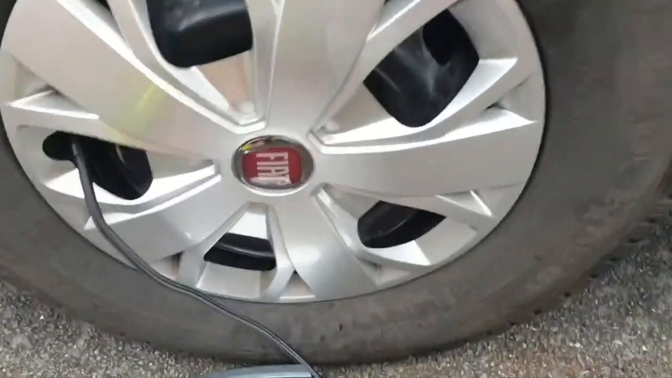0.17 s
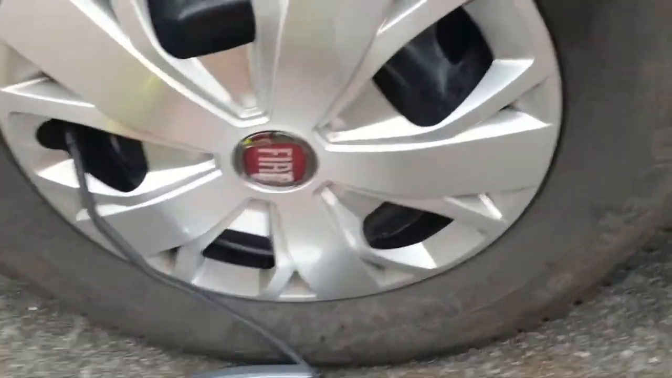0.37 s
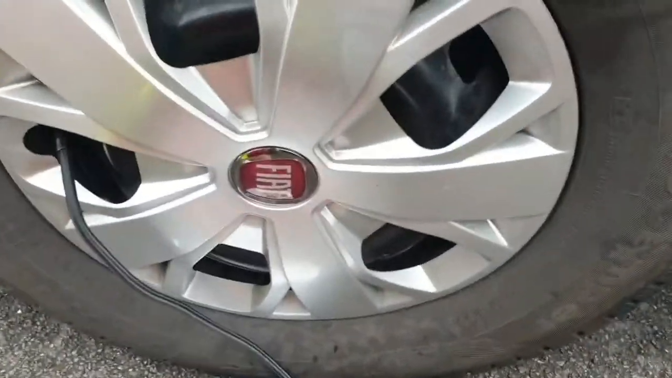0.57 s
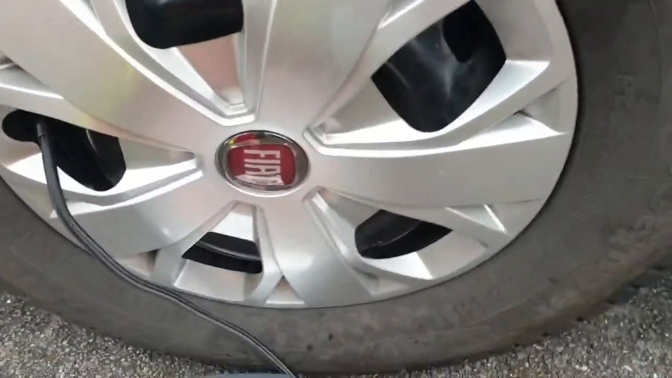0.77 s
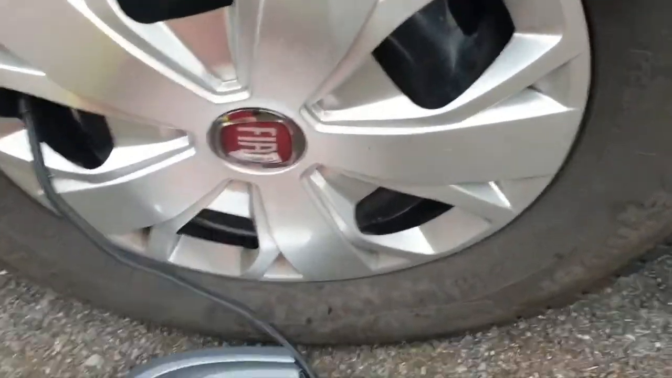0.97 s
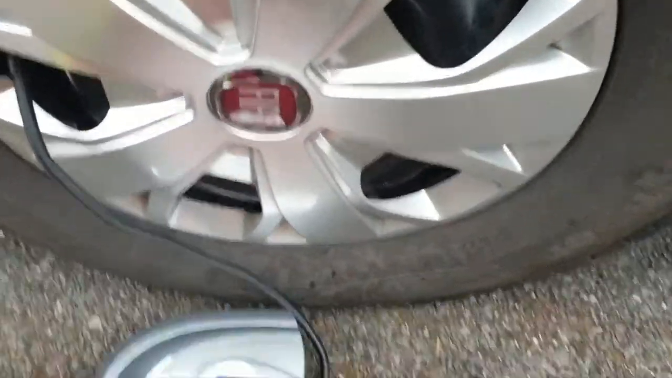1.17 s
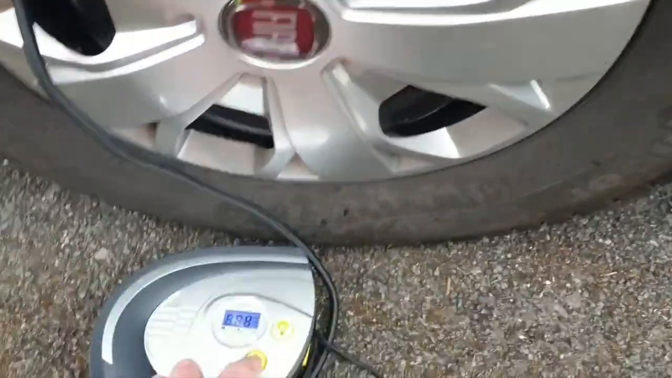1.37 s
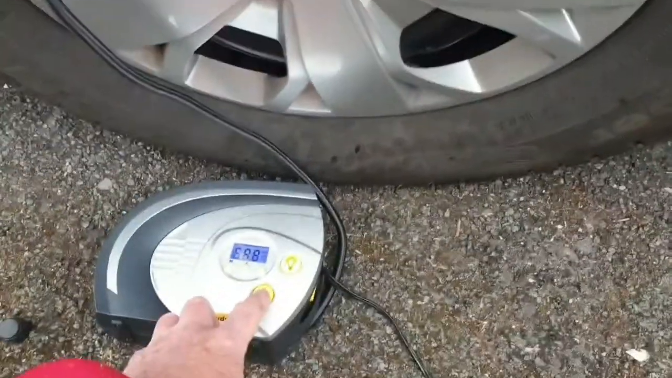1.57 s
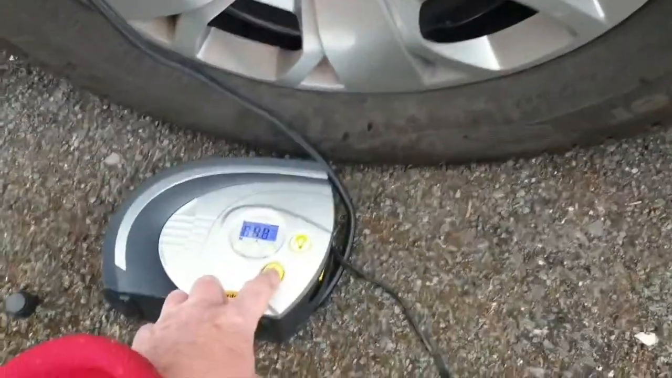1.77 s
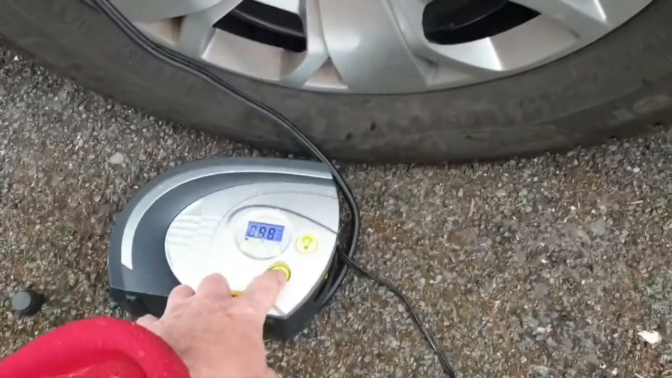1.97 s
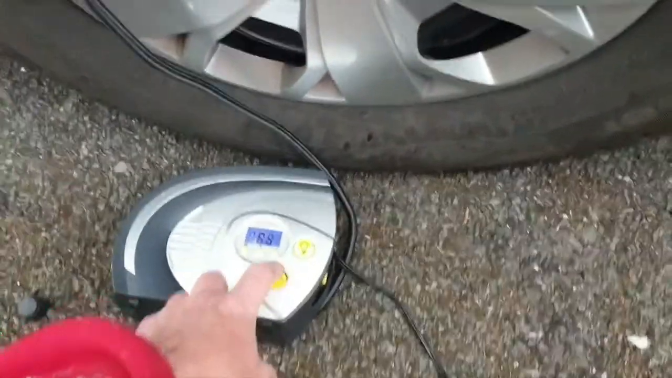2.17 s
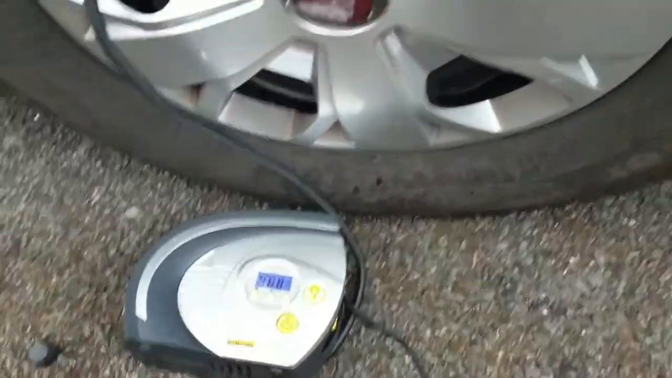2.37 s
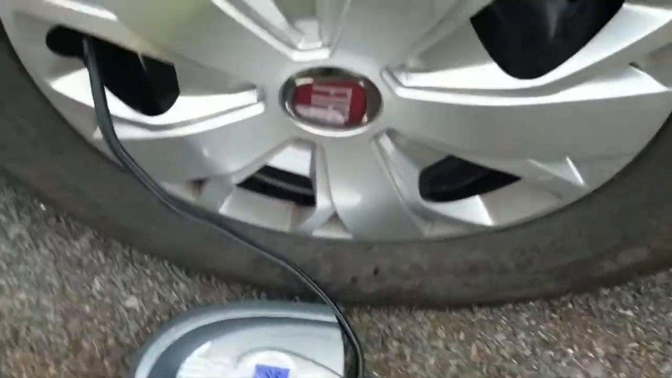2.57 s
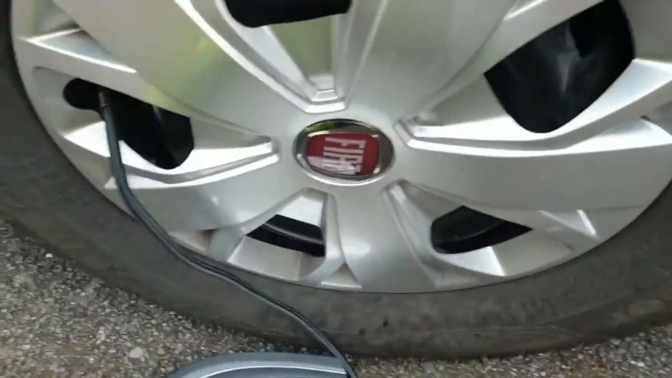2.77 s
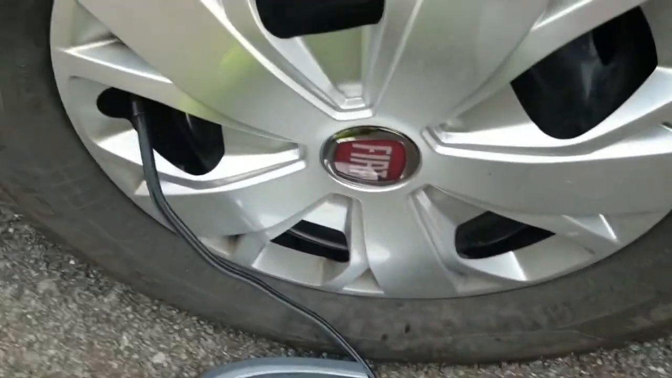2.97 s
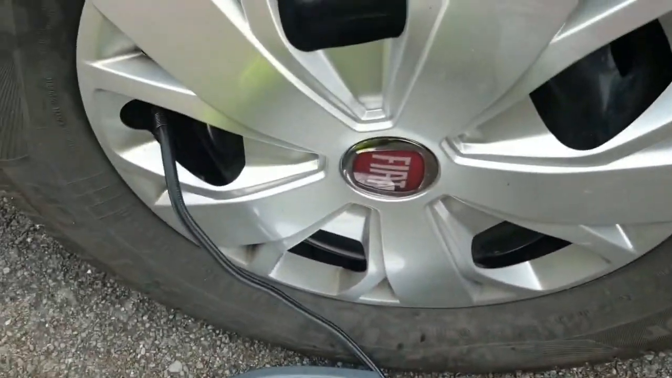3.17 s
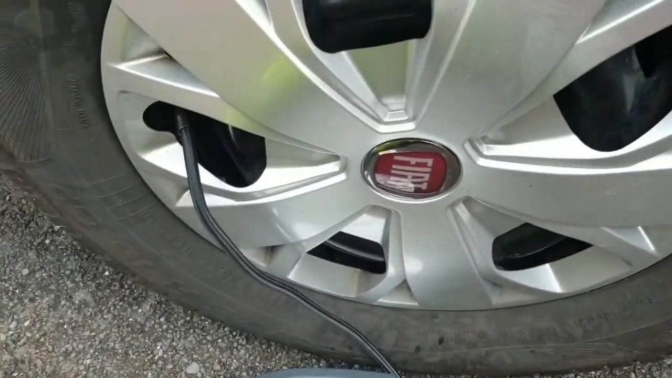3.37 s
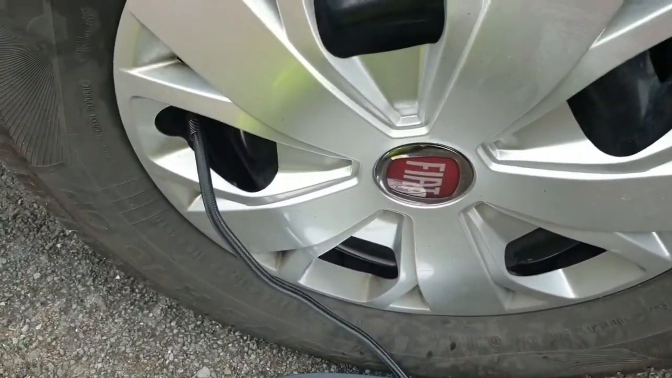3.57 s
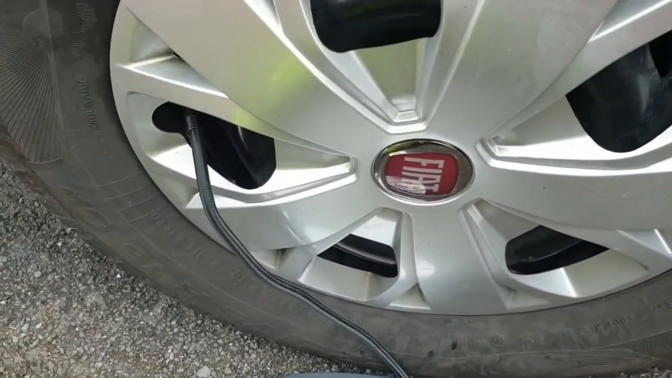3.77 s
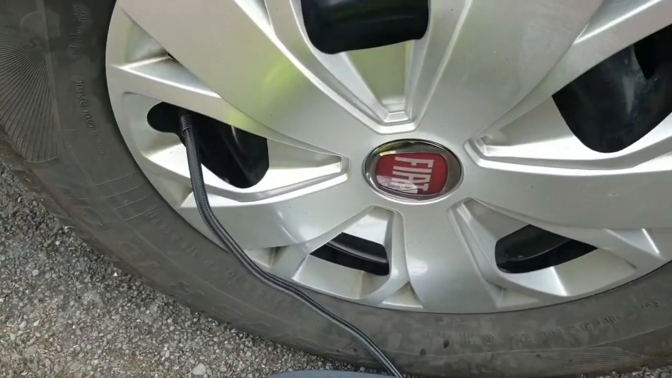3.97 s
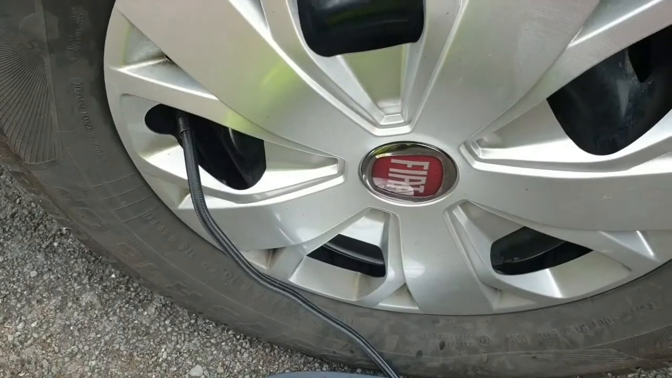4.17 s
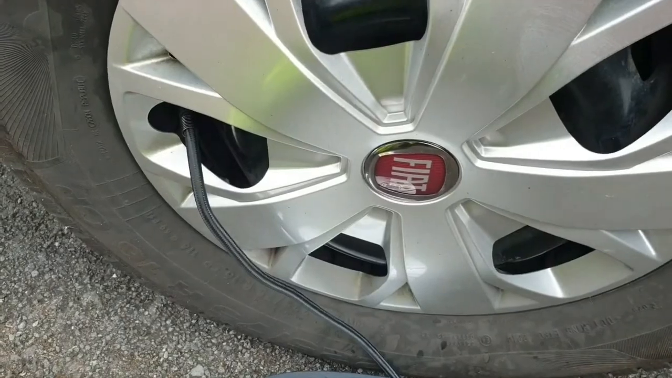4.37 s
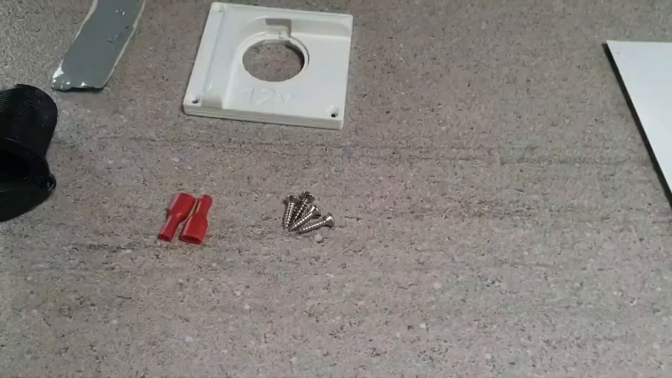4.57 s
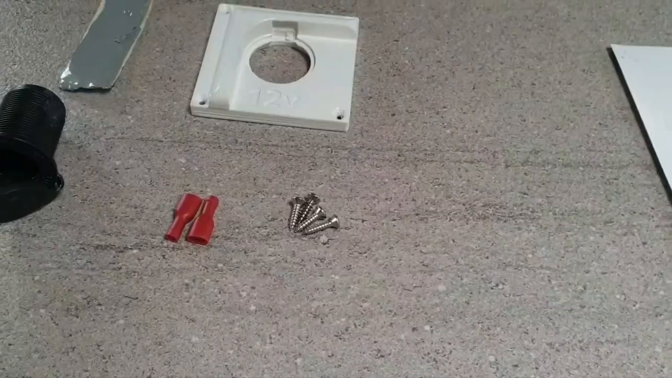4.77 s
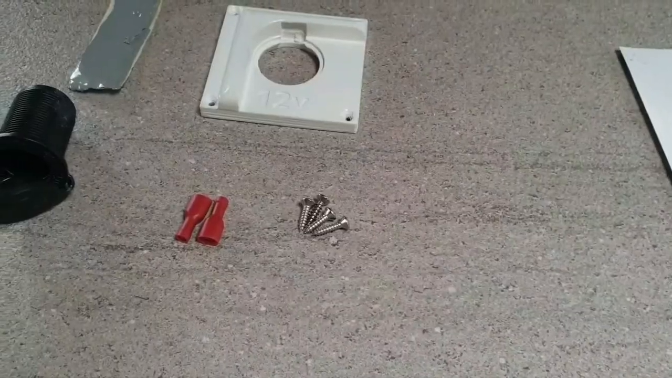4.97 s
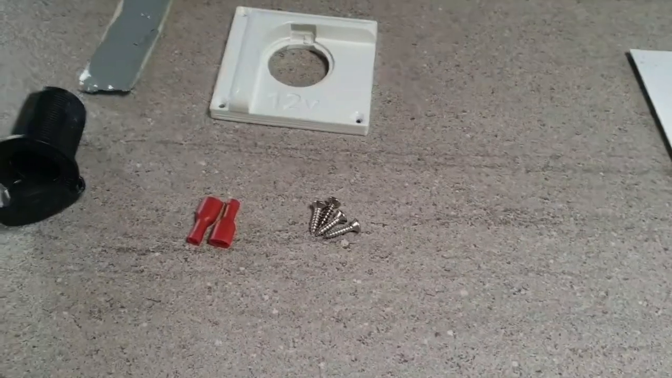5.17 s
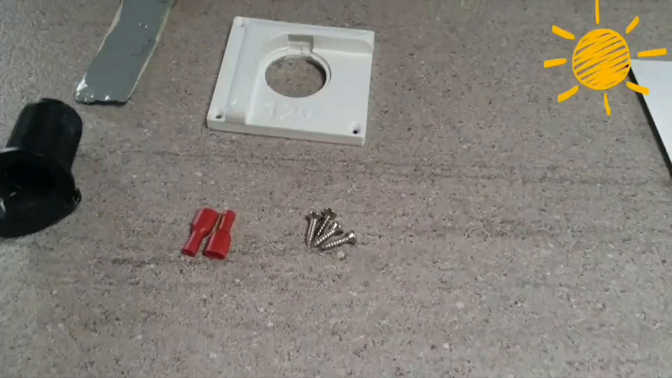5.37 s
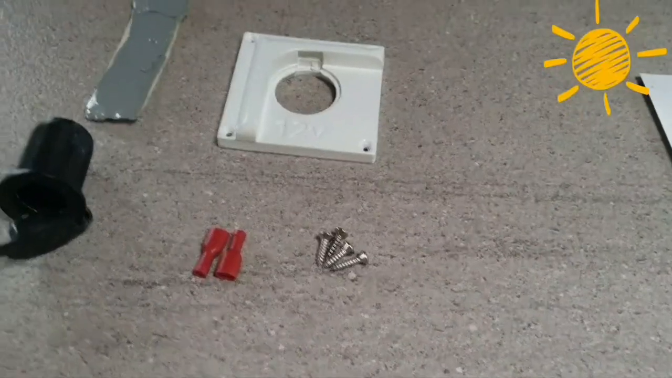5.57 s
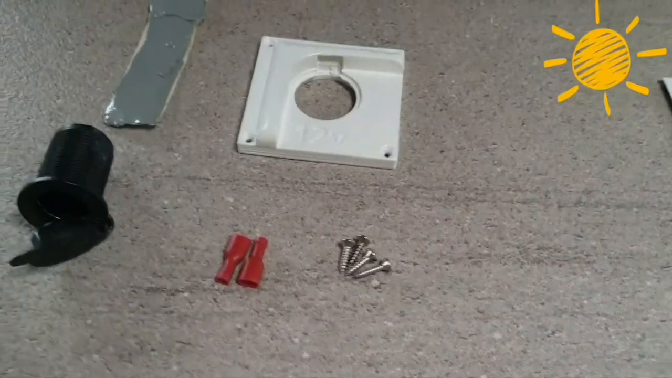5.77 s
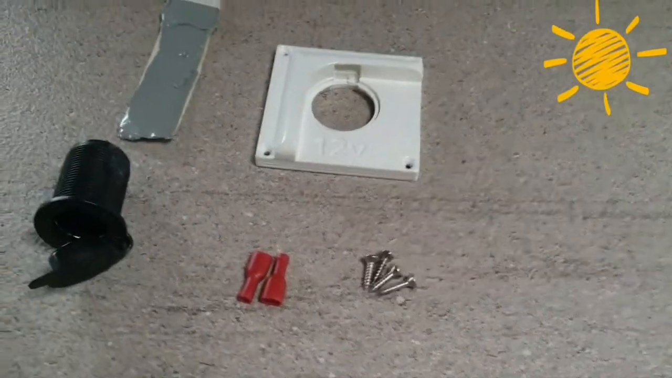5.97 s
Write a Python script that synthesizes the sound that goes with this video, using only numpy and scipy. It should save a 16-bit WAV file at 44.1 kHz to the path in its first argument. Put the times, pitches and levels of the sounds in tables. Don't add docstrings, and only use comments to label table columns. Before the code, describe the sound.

A switch snaps and a little piston air pump bursts into a harsh rattling buzz close by, ending suddenly in a near-silent yard with chirping.

```python
import sys
import numpy as np
from scipy import signal
from scipy.fft import rfft, irfft, next_fast_len
from scipy.io import wavfile
from scipy.ndimage import map_coordinates

SR = 44100
rng = np.random.default_rng(int(sys.argv[2]) if len(sys.argv) > 2 else 0)


def boost_factor(decibels):
    exponent = np.asarray(decibels, float) / 20
    return 10 ** exponent


def transcribe(signal):
    frames = np.atleast_2d(signal).T
    limited = np.clip(frames, -1, 1)
    pcm = np.round(limited * 32767).astype(np.int16)
    wavfile.write(sys.argv[1], SR, pcm)


N = 265041
TIME = np.arange(N) / SR
SIDES = np.array([[.5], [-.5]])

# time_s, turns_per_s
CRANK_SPEED = [(2.045, 13.99), (2.1, 23.95), (2.14, 31.28), (2.18, 35.02), (2.24, 37.28), (2.32, 38.68),
               (2.75, 38.81), (3.0, 39.06), (3.3, 38.96), (3.8, 38.79), (4.2, 38.94), (4.5, 38.81),
               (4.8, 38.61), (5.2, 38.87), (5.43, 38.5)]
FIRST_PUFF_TURN, PINION_TEETH = .7, 11
# time_s, level_db
SCENE_CHANGE = [(5.4255, -8.5), (5.4275, -14), (5.434, -39), (5.452, -38), (5.46, -57)]
# turn_share, pitch_hz, push (minus pulls), width_hz
AIR_KICKS = [
    (-.097, 203.7, -.21, 90),
    (-.03, 336, 0.45, 450),
    (0.024, 708, -0.23, 900),
    (.082, 331.5, -0.077, 23),
    (.119, 543, 0.14, 62.4),
    (.185, 423, -.056, 34),
    (-.004, 735.3, -0.034, 15.6),
    (0.101, 1186, 0.013, 60),
]
# pitch_hz, width_hz, level_db
ROCKING_MODES, ROCKING_S = [(445, 25, 1.5), (457, 47, -8), (934, 39, -4.5)], 0.22
# turn_share after the puff, then feet_db, shell_db, rib_db, head_db, hiss_db
KNOCKS_OF_A_TURN = [
    (.01, 7, -7, 3, -3.5, 0.5),
    (0.062, -10.5, -5.5, -6.5, 3.5, -2.5),
    (0.218, 2, -1, 0.5, -11.5, -9.5),
    (.4, 5.5, -6.5, 8.5, 8.5, 0.5),
    (.56, -0.5, 0, -10.5, -4, -17),
    (.72, -4, 2.5, -9, 4, -12.5),
    (.85, -14, -11, -7.5, 4.5, -1),
]
# low_hz, high_hz, level_db, left-right likeness (0-1), left_right_db
RINGING_PARTS = [
    (820, 2500, -6, 0.3, 1.5),
    (1996, 3080, -0.5, 0.72, 0.4),
    (2820, 4320, -7, 0.2, 1),
    (3630, 5700, 1, 0.35, 2),
    (5400, 13700, 3.5, 0.27, 0),
]
# pitch_hz, width_hz, level_db
MODES_OF_PARTS = [
    [(1166, 170, -0.53), (1500, 85, -3), (1880, 304, 0.2)],
    [(2295, 100, -2), (2376, 60, 0), (2547, 220, -4)],
    [(2866, 540, 0.5), (3260, 170, 1.5), (3600, 700, -2.5)],
    [(4395, 265, -0.19), (4790, 120, -0.85), (5313, 310, 0.11)],
    [(6600, 1900, -4.5), (7590, 650, -4.5), (10080, 1500, -9.5), (13200, 4800, -11.5)],
]
CLICK_DB = [-1, 5.5, 0.5, 2, 0.5]
# time_s, tilt_db per mode step
LOAD_TILT = [(2.1, -1), (2.17, -3.5), (2.3, -3), (2.5, -0.5), (2.9, 0.4), (4.0, 0.8), (4.15, 1.8),
             (5.4, 1.8)]
LOAD_FOLLOWED = [.3, 1.2, -.3, 0.65, .1]
# time_s, level_db, left_right_db
MICROPHONE = [(2.08, -20, 0.5), (2.088, -20, 1), (2.1, -18.5, 5.5), (2.13, -17.5, 2.5), (2.17, -19, 1.5),
              (2.33, -17, 1.5), (2.5, -19.5, .6), (3.0, -20.5, 0.7), (4.0, -21.5, 0.2), (4.12, -21, 1.4),
              (5.42, -22.5, 1.5)]
# time_s, level_db
GRAVEL_BUZZ = [(2.08, -3.5), (2.11, 0.5), (2.17, -1.5), (2.34, -2.5), (2.41, -2.5), (2.51, -3), (2.58, 1),
               (2.79, -2), (2.87, -1), (3.3, 1), (4.02, 0), (4.64, -0.5), (4.7, 3), (4.92, 0.5),
               (5.12, 3.5), (5.21, 0), (5.27, 4), (5.42, 2)]
SHELL_DB, SHELL_BUZZ, SHELL_SWING_DB = 0.07, 0.23, -3.5
HEAD_DB, HEAD_BUZZ, HEAD_SWING_DB = -7, 1.1, 8.5
HISS_DB, PUFF_BUZZ = -12, 0.029
SWING_S, SWING_RISE_S, SWING_BACK_S = 4.03, 0.026, 0.51
PUFF_LAG_S, LAG_S, LAG_SWING_S, LAG_KEPT = .00007, .00001, .00014, 0.68

# time_s, peak_db
SWITCH_SNAPS = [
    (2.049, -20.5),
    (2.089, -26),
    (2.127, 0),
]
# start_s, level_db, low_hz, high_hz, t60_s
SMALL_TICKS = [
    (0.414, -41.5, 6330, 8000, 0.098),
    (1.032, -52, 4960, 14400, .03),
    (1.045, -66, 1970, 12000, 0.028),
    (1.7, -52, 450, 2750, 0.02),
    (2.111, -15, 3155, 3550, 0.087),
    (6.006, -30.5, 9700, 14150, 0.0096),
]
# time_s, peak_db, pitch_hz, left_right_db
GRIP_BUMPS = [(0.037, -41, 48.4, 3), (0.181, -39, 56.5, 8), (0.555, -52, 64.4, 4.5), (0.698, -34, 97, 26),
              (0.817, -31, 63, 11), (1.331, -35, 64.6, 6), (1.445, -42, 61.9, 8), (1.611, -40, 60, 8)]

# time_s, rustle_db
SLEEVE_LEVEL = [(0.0, -48), (0.13, -48.5), (0.16, -46), (0.33, -44.5), (0.38, -49.5), (0.57, -53),
                (0.6, -57.5), (1.03, -71.5), (1.07, -88)]
# pitch_hz, density_db per Hz
CLOTH_COLOUR = [(880, -27), (1500, 0), (1910, -5), (2060, -6), (2290, -4.5), (2960, -6), (7290, -5.5),
                (13700, -10), (14800, -21)]
# time_s, above_rustle_db, rise_s, fall_s
CREASE_SNAPS = [
    (.418, 12, 0.0065, 0.045),
    (.582, 6.5, .04, .008),
    (.735, 9.5, 0.051, .015),
]
SWISH_S, SWISH_WIDTH_S, SWISH_DB, SWISH_FLOOR_DB = 0.38, .1, -47, -5.5

# start_s, length_s, start_hz, end_hz, level_db
BLURRED_FAR_CALLS = [(1.157, .14, 6900, 6500, -74), (1.34, .1, 6900, 6700, -78),
                     (1.498, 0.11, 6600, 6000, -73), (5.46, 0.34, 3170, 3010, -67.5),
                     (5.803, 0.23, 3100, 3100, -72.5)]
THIN_NEAR_CALLS = [(1.152, .14, 3450, 3130, -76), (1.822, 0.06, 6760, 7350, -68),
                   (1.869, 0.043, 4670, 5000, -70), (1.93, 0.046, 6500, 6800, -75),
                   (2.023, 0.022, 5200, 4700, -69)]
YARD_CHATTER = [(5.458, 0.043, 3280, 3430, -60), (5.526, 0.055, 3100, 3360, -60),
                (5.585, 0.037, 3170, 2730, -59), (5.635, .025, 3135, 2900, -67.5),
                (5.665, 0.037, 2800, 3100, -64.5), (5.739, 0.0185, 3350, 3110, -61),
                (5.827, 0.033, 2900, 3120, -62), (5.9, 0.025, 3410, 2700, -60.5),
                (5.93, .02, 3200, 2930, -68), (5.985, 0.025, 3400, 2800, -64.5)]
FAR_SPREAD_HZ, THIN_SPREAD_HZ, CHATTER_SPREAD_HZ = 1000, 210, 520

# time_s, level_db
ROAD_LEVEL = [(0.0, -43.5), (0.5, -44), (0.7, -42), (1.0, -45.5), (1.25, -49), (2.04, -47.5)]
# pitch_hz, density_db per Hz
ROAD_COLOUR = [(15, -36), (25, -16.5), (59, -4), (120, -10), (195, -15), (277, -9), (400, -15.5),
               (600, -23), (1140, -32.5), (1800, -41), (2400, -45), (3200, -57), (7000, -48),
               (14800, -57.5)]
SWELL_DB, SWELL_PER_S = 1.5, 10
DUCK_DB = -9.5
# pitch_hz, density_db per Hz
YARD_COLOUR = [(15, -34), (25, -5.5), (69, -4.5), (200, -12.5), (413, -9.5), (763, -6.5), (1400, -8.5),
               (2000, -15.5), (3140, -15), (3700, -18.5), (4450, -27.5), (7390, -23), (8450, -32.5),
               (14800, -29.5)]
# time_s, level_db
YARD_MURMUR = [(5.46, -2), (5.5, 4), (5.525, -4.5), (5.55, 4.5), (5.62, 1), (5.78, 2), (5.85, 0),
               (5.96, -3.5), (6.0, 0.5)]
YARD_DB = -63
ROAD_PAN_DB, SLEEVE_PAN_DB, YARD_PAN_DB = 4, 2, 0.5
WHINE_HZ, WHINE_WIDTH_HZ, WHINE_DB = 2380, 80, -71


def rms_one(x):
    return x / np.sqrt(np.mean(x ** 2) + 1e-20)


def in_time(rows):
    s, *columns = np.transpose(rows)
    return [np.interp(TIME, s, c) for c in columns]


def pan(left_right_db):
    return boost_factor(left_right_db * SIDES)


def add(out, s, sound):
    a = int(s * SR)
    out[:, a:a + sound.shape[1]] += sound[:, :N - a]


def ring(x, hz, width_hz):
    r, w = np.exp(-np.pi * width_hz / SR), 2 * np.pi * hz / SR
    return signal.lfilter([0, np.sin(w)], [1, -2 * r * np.cos(w), r * r], x + 1e-18)


def band(x, low_hz, high_hz):
    return signal.sosfilt(signal.butter(2, [low_hz, high_hz], "band", fs=SR, output="sos"), x)


def stereo(mid, side, alike):
    return np.sqrt(1 + alike) * mid + np.sqrt(1 - alike) * side * [[1], [-1]]


def pair(alike):
    mid, side = rng.standard_normal((2, N))
    return stereo(mid, side, alike)


def ambience(colour, alike_hz):
    size = next_fast_len(N, real=True)
    hz = np.fft.rfftfreq(size, 1 / SR) + 1
    point_hz, point_db = np.transpose(colour)
    gain = boost_factor(np.interp(np.log(hz), np.log(point_hz), point_db))
    alike = 0.92 / (1 + (hz / alike_hz) ** 3)
    mid, side = rfft(rng.standard_normal((2, size)))
    return rms_one(irfft(gain * stereo(mid, side, alike), size)[:, :N])


def late_left(sound, lag_s):
    left, right = sound * np.ones((2, 1))
    return np.array([map_coordinates(left, [np.arange(N) - lag_s * SR], order=3), right])


def pump():
    running = (TIME > CRANK_SPEED[0][0]) & (TIME < SCENE_CHANGE[-1][0])
    turns = np.cumsum(in_time(CRANK_SPEED)[0] * running) / SR - FIRST_PUFF_TURN
    (puff_db, pan_db), buzz_db = in_time(MICROPHONE), in_time(GRAVEL_BUZZ)[0]

    since = (TIME - SWING_S).clip(0)
    turned = 1 - np.exp(-since / SWING_RISE_S)
    swing = turned * np.exp(-since / SWING_BACK_S)
    shell_db = SHELL_DB + SHELL_BUZZ * buzz_db + SHELL_SWING_DB * swing
    head_db = HEAD_DB + HEAD_BUZZ * buzz_db + HEAD_SWING_DB * swing

    feet, shell, rib, head, hiss = rattle(turns, running, in_time(LOAD_TILT)[0])
    loose = np.interp(TIME, [2.1, 3.0, 4.2, 5.4], boost_factor([-2.5, 0.0, 1.1, -3.5]))
    housing = boost_factor(shell_db) * (shell + loose * rib)
    housing = housing + boost_factor(head_db) * head + boost_factor(HISS_DB + buzz_db) * hiss
    lag_s = LAG_S + LAG_SWING_S * (LAG_KEPT * turned + (1 - LAG_KEPT) * swing)
    low = breathing(turns, running) * pan(0.8) + feet
    sound = late_left(low, PUFF_LAG_S) + late_left(housing, lag_s)

    straining = np.interp(TIME, [2.044, 2.05, 2.074, 2.08], [-52.0, 5.0, -1.5, 5])
    level_db = puff_db + PUFF_BUZZ * buzz_db - 0.81 + straining + in_time(SCENE_CHANGE)[0]
    return sound * boost_factor(level_db) * pan(pan_db) * running


def strikes(turns, share, jitter_s, spread_db):
    at = np.flatnonzero(np.diff(np.floor(turns - share)) > 0)
    early_late, hard_soft = np.clip(rng.standard_normal((2, len(at))), -2, 2)
    clicks = np.zeros(N)
    clicks[at + (jitter_s * SR * early_late).astype(int)] = boost_factor(spread_db * hard_soft)
    return clicks


def breathing(turns, running):
    swirl = pair(0.66) * running
    pulses = sum(push * ring(strikes(turns, share, .00003, .6), hz, width)
                 for share, hz, push, width in AIR_KICKS)
    blur = sum(boost_factor(-42.5) * abs(push) * ring(swirl, hz, width) for _, hz, push, width in AIR_KICKS[3:])
    rumble = boost_factor(-25.5) * band(swirl, 380, 880) + boost_factor(-36.5) * band(swirl, 45, 300)
    hose = boost_factor(-52) * ring(swirl, 673, 230)

    unsettled = running * np.exp(-(TIME - CRANK_SPEED[0][0]).clip(0) / ROCKING_S)
    shaken = (0.31 * swirl + 25 * strikes(turns, 0.0827, .0003, 2.0)) * unsettled
    rocking = sum(boost_factor(db - 43.5) * ring(shaken, hz, width) for hz, width, db in ROCKING_MODES)
    pinion = boost_factor(-16.5) * unsettled * (in_time(CRANK_SPEED)[0] / 39) ** 4
    pinion = pinion * np.sin(2 * np.pi * PINION_TEETH * turns)
    return rms_one(band(pulses, 54, 1500) + blur + rumble + hose + rocking + pinion)


def rattle(turns, running, load_db):
    hits = [strikes(turns, row[0], .00006, 3.35) for row in KNOCKS_OF_A_TURN]
    fall = np.exp(-1 / (0.00096 * SR))
    rung = []
    for k, ((low, high, db, alike, pan_db), modes) in enumerate(zip(RINGING_PARTS, MODES_OF_PARTS)):
        clicks = sum(boost_factor(row[k + 1]) * hit for row, hit in zip(KNOCKS_OF_A_TURN, hits))
        scatter = signal.lfilter([3 * (1 - fall)], [1, -2 * fall, fall ** 2], clicks + 1e-18)
        noise = (scatter + 1.29 * running) * pair(alike)
        soft = min(1, (2500 / low) ** 2)
        drive = noise + 7.1 * soft * boost_factor(CLICK_DB[k]) * clicks
        lean_db = load_db * LOAD_FOLLOWED[k]
        tones = 0
        for j, (hz, width, mode_db) in enumerate(modes):
            gain = (-1) ** j * boost_factor(mode_db + lean_db * j) * np.sqrt(width / SR)
            tones = tones + gain * ring(drive, hz, width)
        sound = band(boost_factor(24) * tones + boost_factor(-5.0) * noise, low, high)
        rung.append(boost_factor(db) * rms_one(sound) * pan(pan_db))
    return rung


def switch_and_ticks():
    out, age, white = np.zeros((2, N)), TIME[:6000], pair(0.6)[:, :6000]
    rise = 1 - np.exp(-age / 0.00053)
    snaps = [(s, db - 14.5, 400, 12000, .06) for s, db in SWITCH_SNAPS]
    for s, db, low, high, t60 in snaps + list(SMALL_TICKS):
        add(out, s, boost_factor(db - 60 * age / t60) * rise * rms_one(band(white, low, high)))
    return out


def grip_bumps():
    out, age = np.zeros((2, N)), TIME[:6000]
    for s, db, hz, pan_db in GRIP_BUMPS:
        swing = np.sin(2 * np.pi * hz * age) * np.exp(-(hz * age - 1.6) ** 2)
        add(out, s, boost_factor(db) * pan(pan_db) * swing)
    return out


def sleeve():
    snaps_db = 0
    for s, db, rise, fall in CREASE_SNAPS:
        away = np.where(TIME < s, (s - TIME) / rise, (TIME - s) / fall)
        snaps_db = snaps_db + db * np.exp(-away)
    rustle = boost_factor(in_time(SLEEVE_LEVEL)[0] + snaps_db + 7.5) * (TIME < 1.12)
    sweep = boost_factor(SWISH_DB + 5.0) * np.exp(-((TIME - SWISH_S) / SWISH_WIDTH_S) ** 2)
    sweep = sweep + boost_factor(SWISH_FLOOR_DB) * rustle
    grain = boost_factor(2.0 * rms_one(band(rng.standard_normal(N), 15, 390)))
    dull = rms_one(band(pair(0.29), 380, 1400))
    return (rustle * ambience(CLOTH_COLOUR, alike_hz=500) + sweep * dull) * grain * pan(SLEEVE_PAN_DB)


def birds():
    out = np.zeros((2, N))
    for calls, spread_hz in [(BLURRED_FAR_CALLS, FAR_SPREAD_HZ), (THIN_NEAR_CALLS, THIN_SPREAD_HZ),
                             (YARD_CHATTER, CHATTER_SPREAD_HZ)]:
        low_pass = signal.butter(2, spread_hz / SR)
        for s, length, start_hz, end_hz, db in calls:
            n = min(int(length * SR), N - int(s * SR))
            blur = signal.lfilter(*low_pass, rng.standard_normal((2, SR + 2000)))[:, -n:]
            tone = np.sin(2 * np.pi * np.cumsum(np.linspace(start_hz, end_hz, n)) / SR)
            add(out, s, boost_factor(db + 7.5) * rms_one(blur) * tone * np.sqrt(np.hanning(n)))
    return out


def traffic():
    swell_db = SWELL_DB * rms_one(band(rng.standard_normal(N), 1.3, SWELL_PER_S))
    duck_db = DUCK_DB * (TIME > CRANK_SPEED[1][0])
    level_db = in_time(ROAD_LEVEL)[0] + swell_db + 9.5 + duck_db
    return boost_factor(level_db) * ambience(ROAD_COLOUR, alike_hz=680) * pan(ROAD_PAN_DB)


def far_whine():
    return boost_factor(WHINE_DB) * rms_one(ring(pair(.3), WHINE_HZ, WHINE_WIDTH_HZ))


def yard():
    level_db = YARD_DB + in_time(YARD_MURMUR)[0]
    return boost_factor(level_db) * pan(YARD_PAN_DB) * ambience(YARD_COLOUR, alike_hz=600)


def scene():
    before = boost_factor(in_time(SCENE_CHANGE)[0])
    close = pump() + switch_and_ticks() + grip_bumps()
    roadside = (sleeve() + traffic() + far_whine()) * before
    return close + roadside + birds() + yard() * np.clip(1 - before, 0, 1)


def roll_off(x):
    return signal.sosfilt(signal.butter(12, 15700, fs=SR, output="sos"), x)


def record(dry):
    rounded = np.tanh(dry / 2) * 2
    top_cut = signal.cheby2(12, 60, 15250, fs=SR, output="sos")
    mix = signal.sosfilt(top_cut, rounded)
    return roll_off(mix)


dry = scene()
out = record(dry)
transcribe(out)
```